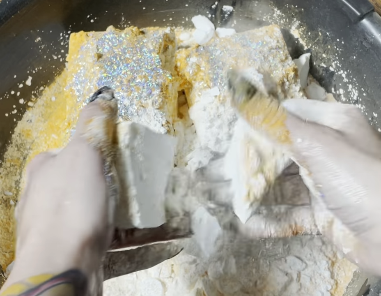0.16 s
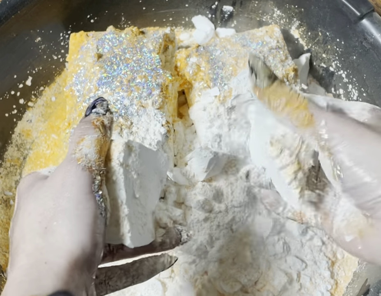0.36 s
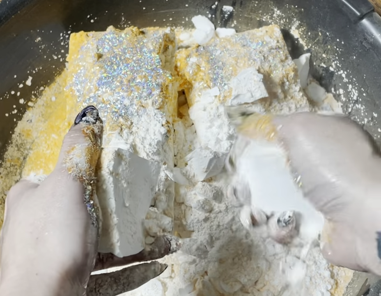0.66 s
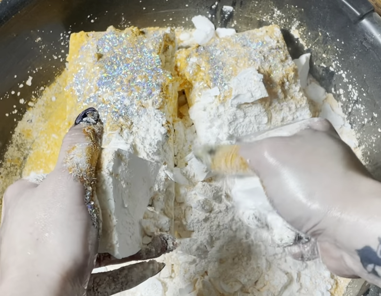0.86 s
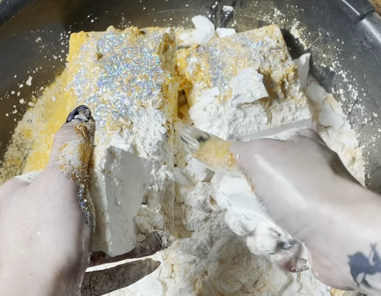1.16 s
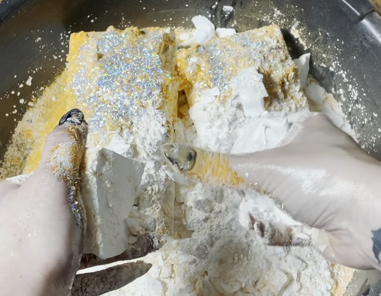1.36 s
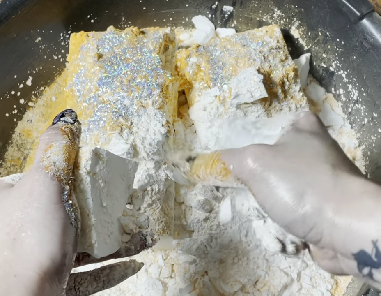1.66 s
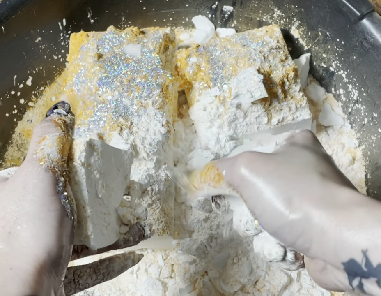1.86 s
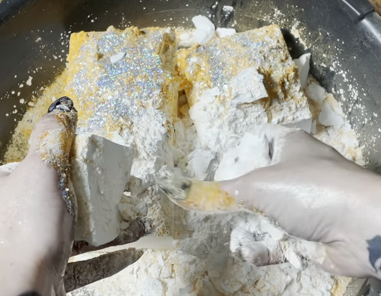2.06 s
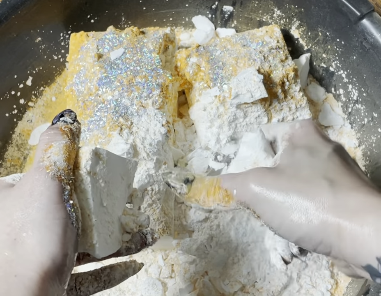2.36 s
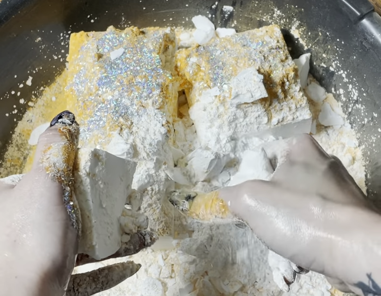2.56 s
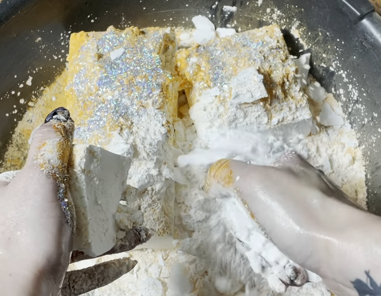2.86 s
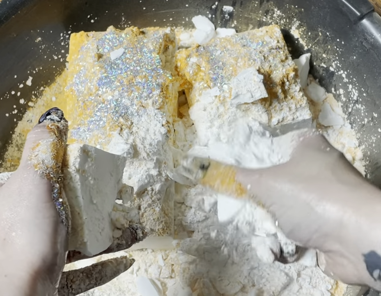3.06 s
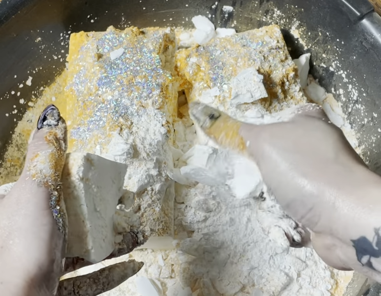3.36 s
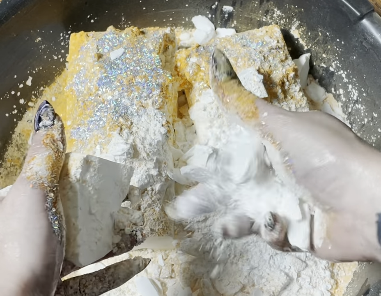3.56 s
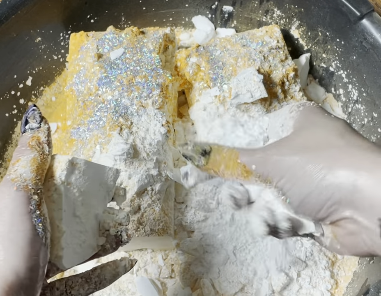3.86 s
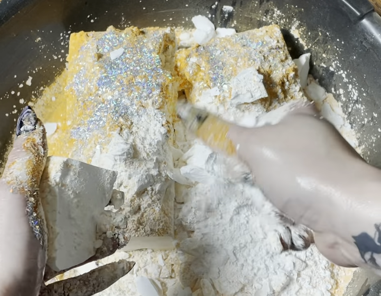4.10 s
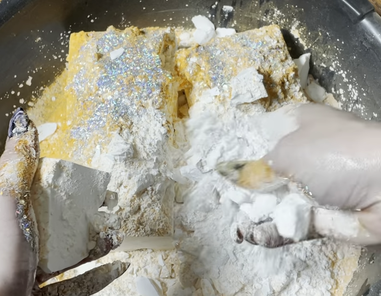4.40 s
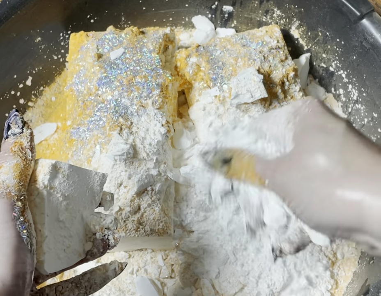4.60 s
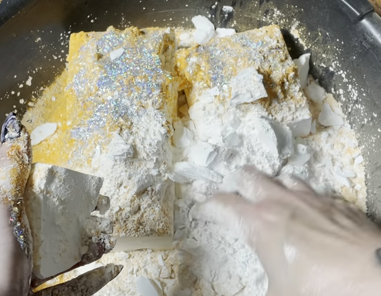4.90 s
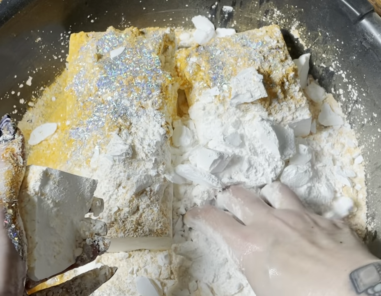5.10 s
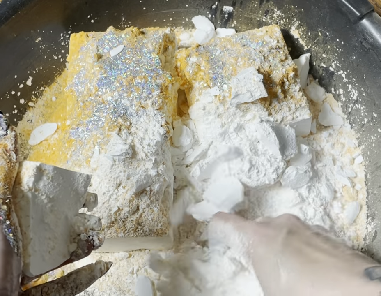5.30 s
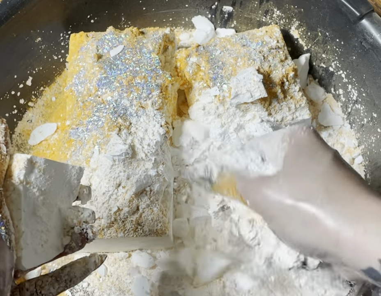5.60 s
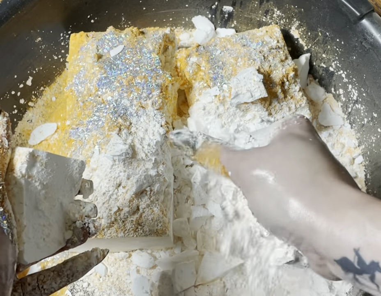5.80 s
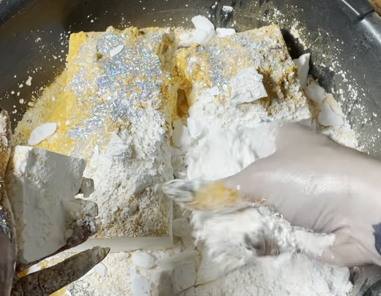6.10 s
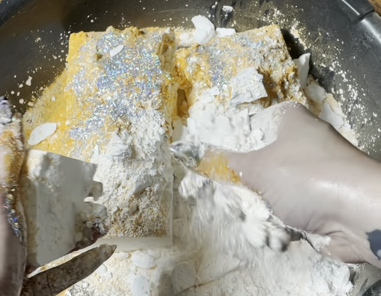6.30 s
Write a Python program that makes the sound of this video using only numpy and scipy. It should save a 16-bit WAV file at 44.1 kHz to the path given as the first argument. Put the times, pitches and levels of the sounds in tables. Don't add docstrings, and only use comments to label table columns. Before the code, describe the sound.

Dry chalk blocks crack and crunch in a squeezing fist over a powder-filled metal bowl, crumbs and gritty grains trickling down, very close and dry.

```python
import sys
import numpy as np
from scipy import signal
from scipy.fft import rfft, irfft, next_fast_len
from scipy.io import wavfile
from scipy.ndimage import uniform_filter1d

SR = 44100
rng = np.random.default_rng(int(sys.argv[2]) if len(sys.argv) > 2 else 0)


def waveform_to_disk(signal):
    frames = np.transpose(np.atleast_2d(signal))
    scaled = np.clip(frames, -1, 1) * 32767
    samples = np.round(scaled).astype(np.int16)
    wavfile.write(sys.argv[1], SR, samples)


def ratio(d):
    e = np.asarray(d, float) / 20
    return 10 ** e


N = 284440


def rms_one(x):
    return x / np.sqrt(np.mean(x ** 2) + 1e-20)


def power_sum_db(a_db, b_db):
    return 10 * np.log10(ratio(a_db) ** 2 + ratio(b_db) ** 2)


def in_time(rows):
    s, *columns = np.transpose(rows)
    return [np.interp(np.arange(N) / SR, s, c) for c in columns]


def at_hz(points, hz):
    point_hz, value = np.transpose(points)
    return np.interp(np.log(np.maximum(hz, 1)), np.log(point_hz), value)


def add(out, s, sound):
    at = round(s * SR)
    out[..., at:at + sound.shape[-1]] += sound[..., :N - at]


def resonance(x, hz, width_hz):
    r = np.exp(-np.pi * width_hz / SR)
    gain = (1 - r * r) / 2
    return signal.lfilter(np.array([1, 0, -1]) * gain, [1, -2 * r * np.cos(2 * np.pi * hz / SR), r * r], x)


def band(x, low_hz, high_hz, order):
    return signal.sosfilt(signal.butter(order, [low_hz, high_hz], "band", fs=SR, output="sos"), x)


def colour(spectrum, size=256):
    cepstrum = irfft(np.log(ratio(at_hz(spectrum, np.arange(size + 1) * SR / 2 / size))))
    cepstrum[1:size] *= 2
    cepstrum[size + 1:] = 0
    return irfft(np.exp(rfft(cepstrum)))[:size]


def drift(rate, size):
    r = np.exp(-40 * np.pi * rate / SR)
    noise = rng.standard_normal((size, N // 20 + 2002))
    slow = signal.lfilter([1], [1, -2 * r, r * r], noise)[:, 2000:]
    return np.array([np.interp(np.arange(N) / 20, np.arange(len(s)), rms_one(s)) for s in slow])


def swells(rows, rest_db):
    s, db, rise_s, release_s = np.transpose(rows)[:, :, None]
    time = np.arange(0, N + 64, 64) / SR - s
    rise = -time / np.maximum(rise_s, .01)
    release = time / np.maximum(release_s, .01)
    each_db = db - 15 * np.where(time < 0, rise, release)
    total_db = 10 * np.log10((ratio(each_db) ** 2).sum(0) + ratio(rest_db) ** 2)
    return np.interp(np.arange(N) / 64, np.arange(len(total_db)), total_db)


def strokes(rows, rest_db):
    s, length_s, start_db, end_db = np.transpose(rows)[:, :, None]
    time = np.arange(0, N + 64, 64) / SR - s
    inside = np.clip(time, 0, length_s)
    edge_db_per_s = 466
    each_db = start_db + (end_db - start_db) * inside / length_s - edge_db_per_s * np.abs(time - inside)
    total_db = np.maximum(each_db.max(0), rest_db)
    return np.interp(np.arange(N) / 64, np.arange(len(total_db)), total_db)


def fractures(shape, per_s, spread_db):
    sizes = ratio(spread_db * np.minimum(rng.exponential(1, shape), 4.5)) * rng.choice([-1, 1], shape)
    return sizes * (rng.random(shape) < per_s / SR)


# frequency in Hz, level in dB per Hz.
SNAP = [(180, -31.5), (300, 8.5), (725, -1.5), (1010, 2.5), (2360, -5.5), (4090, -4.5), (5340, -7),
        (7320, -6.5), (10200, -13), (16000, -20.5)]


def burst(excite, hz, t60, sharpness, broad_db):
    excite = excite * ratio(-60 * np.arange(len(excite)) / SR / max(t60, .002))
    snap = np.convolve(excite, colour(SNAP))[:len(excite)]
    width_hz = hz / sharpness
    ring = rms_one(resonance(snap, hz, width_hz))
    second_ring = rms_one(resonance(snap, min(1.847 * hz, 8000), width_hz))
    dull = np.exp(-2 * np.pi * 5.4 * hz / SR)
    broad = rms_one(signal.lfilter([1], [1, -dull], snap))
    sound = ring + ratio(broad_db - 1.0) * second_ring + ratio(broad_db) * broad
    return sound / np.abs(sound).max()


# start in seconds, peak in dB, ring of the lump in Hz, dying time in seconds.
CRACKS = [(0.6951, -3.5, 5530, 0.015), (0.7198, -5.5, 3660, 0.0055), (0.7499, -3.5, 3850, 0.013),
          (0.7512, -14, 3300, .015), (0.754, -8, 3300, .008), (0.7602, -13, 3360, .0045),
          (0.7636, -10, 3620, 0.0056), (0.77, -12, 3320, 0.011), (0.7914, -1.5, 3370, 0.013),
          (0.7933, -1.5, 3300, 0.011), (0.8051, -11.5, 3300, 0.023), (0.8064, -6, 3300, 0.01),
          (0.8387, 0.5, 3900, 0.0045), (0.8654, -18, 3560, 0.022), (0.8806, -9, 3650, 0.005),
          (2.3969, -17, 3930, 0.014), (2.5197, -3.5, 1940, 0.0066), (2.5224, 1, 4050, 0.0066),
          (2.5736, -12.5, 3680, 0.0062), (2.71, 4, 3830, 0.0093), (2.7137, -4, 1740, 0.02),
          (2.7174, -5, 3300, 0.021), (2.7214, -3.5, 2070, 0.028), (2.7234, -5.5, 3750, 0.027),
          (3.9308, -9, 1140, 0.0018), (3.961, -16.5, 3020, 0.0088), (3.9785, -16, 3000, 0.011),
          (4.0033, -5, 3100, 0.0078), (4.0214, -8, 5350, 0.0068), (4.0554, -11, 3300, 0.0074),
          (4.4631, -13.5, 7900, 0.009), (5.463, -21, 856, 0.036), (5.5697, -2, 3040, 0.0076),
          (1.2328, -11.5, 4440, 0.0042)]
# start in seconds, peak in dB, ring of the lump in Hz, dying time in seconds.
THUDS = [(0.3572, -27, 1060, 0.0046), (0.7, -10.5, 7250, 0.021), (1.3415, -22, 4400, 0.0074),
         (1.462, -19.5, 680, 0.014), (1.6715, -5.5, 1130, 0.0056), (2.0126, -18.5, 1500, 0.021),
         (2.433, -10.5, 3240, 0.015), (2.6833, -3.5, 3740, 0.0063), (2.8945, -19, 2370, 0.0017),
         (2.5198, -15, 486, 0.011), (4.7682, -18, 1400, 0.022), (4.9694, -2.5, 1100, 0.0039),
         (0.6952, -12, 510, 0.015), (5.142, -33, 700, 0.045), (5.21, -32, 700, 0.034),
         (5.2256, -21, 1000, 0.059), (5.28, -25, 1300, 0.037), (5.526, -21.5, 3140, 0.0092),
         (5.5694, -19, 680, 0.021), (5.59, -25, 7000, 0.009), (5.6405, -16.5, 1510, 0.014),
         (5.665, -14.5, 7100, 0.0071), (5.711, -21.5, 2220, 0.007)]
# start in seconds, peak in dB, ring of the crumb in Hz.
TICKS = [(0.2591, -19.5, 6950), (0.593, -23, 7440), (0.9262, -16.5, 3880), (0.9347, -12.5, 3630),
         (0.9711, -19.5, 4080), (1.013, -23, 4330), (1.044, -21, 5160), (1.204, -21.5, 4010),
         (1.485, -11.5, 3260), (1.6404, -17, 3500), (1.7247, -21.5, 3700), (1.797, -23.5, 7400),
         (1.9618, -26, 5700), (2.4493, -15, 3870), (3.1069, -17.5, 4060), (3.2747, -23, 6140),
         (3.3362, -20.5, 5100), (3.7927, -26, 7500), (3.921, -15, 6800), (4.01, -19, 3320),
         (4.3988, -23, 6030), (3.9817, -19, 3200), (5.744, -23, 3240), (5.845, -21.5, 2880),
         (6.438, -18, 4600), (0.73, -14, 6000), (0.733, -14, 3300), (0.779, -19, 3520), (0.8215, -25, 3800),
         (0.8542, -21, 3600), (0.992, -24, 7000), (1.019, -28, 7000), (1.118, -31, 2500),
         (2.222, -28, 2600), (1.527, -25, 6000), (1.659, -33, 1500), (3.9583, -22, 3300),
         (3.173, -30, 4000), (3.236, -25.5, 7000), (3.362, -31, 5500), (3.525, -32, 3000),
         (4.784, -29, 5500), (4.815, -27.5, 5000), (5.812, -23, 4200), (5.484, -23, 2500),
         (0.569, -27, 5200), (5.68, -18, 6000)]
# start in seconds, peak in dB, ring of the piece in Hz.
CLACKS = [(1.5129, -23.5, 2450), (1.595, -39, 3100), (1.9179, -29, 1410), (2.14, -27, 1340),
          (2.341, -27, 795), (2.827, -22, 1570), (3.013, -27, 1080), (3.5926, -31, 2180),
          (3.6679, -23, 1180), (3.9016, -23, 3230), (3.9232, -20.5, 2720), (4.452, -28.5, 664),
          (4.756, -27, 3000), (4.763, -17.5, 1400), (5.1855, -24, 890), (5.4674, -22, 1160),
          (6.005, -27, 1820), (6.1807, -29, 1510), (6.213, -21.5, 1300), (6.332, -22.5, 1190), ]
# start in seconds, peak in dB, ring of the crumb
# in Hz.
CRUMBS = [(0.257, -24.5, 6300), (0.5925, -27, 7200), (0.7238, -14, 3640), (0.7496, -11, 3270),
          (0.8734, -12.5, 5040), (0.8987, -24, 4440), (0.9497, -18, 5510), (0.9898, -26.5, 3080),
          (1.0514, -30, 3360), (1.086, -27.5, 4200), (1.096, -29, 2860), (1.1224, -27, 3570),
          (1.2274, -20, 4720), (1.464, -15.5, 4700), (1.5952, -28, 3140), (1.6186, -22.5, 3230),
          (1.669, -13, 2220), (1.8504, -34, 4200), (1.8573, -30, 5660), (1.8776, -28, 4100),
          (1.9104, -24.5, 4330), (2.25, -29, 4290), (2.331, -26.5, 3730), (2.3824, -26, 6220),
          (2.4152, -25, 5020), (2.465, -18, 8460), (2.563, -16, 4610), (2.649, -24.5, 3380),
          (2.657, -24, 3060), (2.6852, -1, 4200), (2.7983, -19, 3600), (2.8721, -30, 4480),
          (2.8812, -26, 2220), (2.8954, -18, 2580), (2.9884, -27.5, 5600), (3.372, -29, 3190),
          (3.383, -33, 3270), (3.3984, -23, 3300), (3.451, -29, 3150), (3.6035, -27.5, 6330),
          (3.7083, -32, 4350), (3.9055, -27, 3360), (3.9748, -24, 3230), (3.9896, -27, 5190),
          (4.1001, -19, 5600), (4.148, -27, 3210), (4.6574, -29, 2650), (4.759, -21, 3170),
          (4.7668, -15.5, 2200), (4.9694, -13, 5000), (5.4663, -24, 2540), (5.4716, -16.5, 2690),
          (5.6566, -16.5, 3140), (5.7377, -21.5, 3380), (5.7766, -24.5, 3420), (5.8657, -28, 3550),
          (6.1766, -28, 2650), (6.372, -25, 2560), (6.4016, -29, 3190), (6.427, -32, 3170)]
# start in seconds, peak in dB, ring of the piece in Hz.
NUDGES = [(0.3452, -34, 1270), (0.8055, -14, 1920), (0.8722, -27, 1230), (1.0236, -35, 1230),
          (1.122, -34, 1410), (1.1527, -36, 1490), (1.2318, -30, 1060), (1.4434, -27, 540),
          (1.5122, -30, 2130), (2.598, -25, 1150), (1.622, -35, 1290), (1.797, -30, 1280),
          (1.9599, -33, 880), (2.3236, -33, 1310), (2.3617, -34, 1740), (2.3682, -31, 1850),
          (2.3968, -18.5, 1410), (2.8741, -24.5, 510), (2.8798, -31, 2170), (3.1698, -33, 970),
          (3.2774, -33, 1380), (3.3004, -28, 520), (3.6284, -31, 542), (5.175, -25, 620),
          (3.8888, -29, 1080), (4.0212, -19.5, 1060), (4.1084, -34, 990), (4.15, -35, 1400),
          (4.1598, -32, 1410), (4.7762, -26, 1340), (5.2397, -19, 1440), (5.4405, -23, 1440),
          (5.5231, -23.5, 540), (5.8683, -32, 1340), (5.9162, -36, 650), (2.555, -20, 1100),
          (6.3126, -27, 1070), (6.385, -28, 1030), (6.412, -35, 1060), (6.4377, -23, 1440)]
DRY_PUSH_DB, HEAVY_PUSH_DB = -26.5, -9
TICK_S, CLACK_S, CRUMB_S, NUDGE_S = 0.0085, 0.015, 0.0068, 0.014


def cracks():
    rows = [(*row, DRY_PUSH_DB) for row in CRACKS] + [(*row, HEAVY_PUSH_DB) for row in THUDS]
    for small, t60 in [(TICKS, TICK_S), (CLACKS, CLACK_S), (CRUMBS, CRUMB_S), (NUDGES, NUDGE_S)]:
        rows += [(*row, t60, DRY_PUSH_DB) for row in small]
    out, time = np.zeros((2, N)), np.arange(1400) / SR
    trains = fractures((len(rows), 1400), per_s=9000, spread_db=4.5)
    trains[:, 3] = 5.5
    push = np.sin(2 * np.pi * 380 * time) * ratio(-60 * time / 0.01)
    for k, ((s, db, hz, t60, push_db), train) in enumerate(zip(rows, trains)):
        broad_db = -9.5 + 2.7 * np.log2(3500 / hz)
        sound = burst(train, hz, t60, sharpness=3.2, broad_db=broad_db) + ratio(push_db + 6.5) * push
        add(out[k % 2], s, ratio(db) * sound)
    return out


# start in seconds, peak in dB, centre in Hz, dying time in seconds,
# sharpness of the ring as a plain ratio.
CRUNCHES = [(0.6949, -9.5, 940, 0.0077, 0.77), (0.699, -6, 3430, 0.02, 4.3), (0.7127, -9, 7350, 0.03, 15),
            (0.04, -34, 5640, 0.33, 5), (1.6696, -10, 1520, 0.055, 0.19), (2.012, -19, 1830, 0.75, 2.6),
            (2.522, -15, 2040, 0.6, 2.9), (2.685, 4, 2350, 0.016, 1.8), (2.709, -3.5, 2200, 0.47, 1.6),
            (2.895, -16.5, 1110, 0.24, 0.9), (4.768, -7, 1400, 0.034, 9.1), (4.784, -21, 1400, 0.63, 8.9),
            (4.971, -13.5, 1400, 0.76, 3)]


def crunches():
    out = np.zeros(N)
    trains = fractures((len(CRUNCHES), 9000), per_s=5000, spread_db=4.5)
    trains *= 1 + 3.3 * np.exp(-np.arange(9000) / 250)
    for (s, db, hz, t60, sharpness), train in zip(CRUNCHES, trains):
        add(out, s, ratio(db) * burst(train, hz, t60, sharpness, broad_db=-2.5 * sharpness))
    return out


# time in seconds, slips per second, level in dB.
CREAK = [
    (1.138, 120, -17.5),
    (1.165, 240, -19.5),
    (1.205, 260, -21.5),
]
# frequency in Hz, width in Hz, level in dB.
CREAK_RINGS = [(1690, 800, 0.5), (2230, 1300, -16), (4530, 900, -5), (6800, 1200, -27)]


def creak():
    per_s, level_db = in_time(CREAK)
    time = np.arange(N) / SR
    squeezed = (time > CREAK[0][0]) * (time < CREAK[-1][0])
    turns = np.cumsum(per_s * squeezed) / SR
    sizes = ratio(level_db + 2.7 * rng.standard_normal(N))
    slips = np.diff(np.ceil(turns), prepend=0) * sizes + 1e-18
    rings = sum(ratio(db) * resonance(slips, hz, width_hz) * 1000 / width_hz
                for hz, width_hz, db in CREAK_RINGS)
    return ratio(10.0) * rings


# start in seconds, peak in dB, frequency in Hz.
CHIRPS = [
    (.109, -44, 2650),
    (.486, -41, 2750),
    (0.53, -53, 1700),
]


def chirps():
    out, time = np.zeros(N), np.arange(800) / SR
    swell = time / .002 * np.exp(1 - time / .002)
    for s, db, hz in CHIRPS:
        add(out, s, ratio(db) * swell * np.sin(2 * np.pi * hz * time))
    return out


# start in seconds, length in seconds, first and last level in dB.
SQUEEZES = [(0, 0.11, -46.5, -55.5), (.25, 0.16, -55, -57.5), (.46, 0.16, -53.5, -54),
            (.6, 0.094, -48, -42.5), (.7, 0.15, -38, -40.5), (.87, 0.21, -46.5, -49.5),
            (1.13, 0.13, -48, -41.5), (1.28, 0.32, -50, -45.5), (1.68, 0.21, -41, -60.5),
            (1.91, 0.077, -54.5, -41.5), (2.02, 0.22, -53.5, -47.5), (2.29, 0.092, -49, -49.5),
            (2.44, .04, -48.5, -46), (2.53, 0.16, -44, -56), (2.71, 0.12, -27.5, -55),
            (2.85, 0.21, -48.5, -49), (3.1, 0.32, -47, -54.5), (3.38, 0.22, -41.5, -63.5),
            (3.6, 0.51, -57, -46.5), (3.9, 0.13, -51.5, -44), (4.05, 0.25, -49, -50.5),
            (4.4, 0.064, -57, -40.5), (4.47, 0.2, -49, -46), (4.75, 0.26, -46.5, -58),
            (4.98, 0.32, -48, -41.5), (5.29, 0.16, -47.5, -50.5), (5.46, 0.11, -48, -52),
            (5.56, 0.38, -43, -51.5), (6.0, 0.076, -53.5, -49), (6.13, 0.29, -50, -42.5)]
# peak time in seconds, level in dB, rise in seconds, release in seconds.
TUMBLES = [(.379, -51, 0.055, 0.04), (2.018, -33, 0.011, 0.15), (2.544, -57, 0.03, 0.12),
           (2.91, -39.5, 0.058, 0.089), (3.187, -46.5, 0.28, 0.64), (4.775, -33.5, 0.022, 0.12),
           (4.95, -30.5, 0.074, 0.15), (5.15, -31.5, 0.023, 0.17), (5.25, -33.5, 0.12, 0.23),
           (5.47, -36.5, 0.14, 0.12), (5.661, -39, 0.23, 0.28)]
# peak time in seconds, level in dB, rise in seconds, release in seconds.
PUFFS = [(.093, -47.5, 0.1, 0.03), (.31, -52, 0.26, 0.13), (.676, -48.5, 0.4, 0.015), (1.7, -56, .05, 0.16),
         (1.98, -48.5, 0.1, 0.028), (2.04, -46, 0.04, 0.069), (2.54, -52, 0.064, 0.06),
         (3.187, -52.5, 0.059, 0.45), (3.41, -70, 0.088, 0.068), (4.1, -46.5, 0.057, 0.068),
         (4.77, -47, 0.05, 0.049), (5.08, -47, 0.06, 0.092), (5.23, -45, 0.16, 0.08)]
# frequency in Hz, level in dB per Hz.
GRIT = [(120, -35), (200, -5.5), (473, -5), (738, -8.5), (983, -7.5), (2480, -2), (3350, -0.5), (7090, -3),
        (9000, -8.5), (11700, -67), (19800, -120)]
# frequency in Hz, share common to both as a plain ratio.
LIKENESS = [(200, 0.22), (600, 0.91), (2000, 0.81), (8000, 0.82), (15000, 0.74)]
# frequency in Hz, width in Hz, level in dB.
HOLLOWS = [(1400, 40, -1.5), (3300, 830, -6)]
REST_GRIT_DB, REST_LUMPS_DB, REST_DUST_DB = -62, -57, -75
LUMPS_IN_GRIT_DB, DUST_IN_GRIT_DB = -2, -11.5


def crumble():
    grit_db = strokes(SQUEEZES, REST_GRIT_DB)
    dust_db = power_sum_db(swells(PUFFS, REST_DUST_DB), grit_db + DUST_IN_GRIT_DB)
    coarse_db = power_sum_db(swells(TUMBLES, REST_LUMPS_DB), grit_db + LUMPS_IN_GRIT_DB)
    edges = np.append(200 * 2 ** np.arange(0, 5.6, .5), [10400, 17000])
    slips = ratio(1.3 * drift(40, size=1)[0])
    patches = drift(8.7, size=len(edges))
    ticks = rms_one(fractures(N, 350 * slips ** 2, spread_db=4.7))
    pops = fractures((2, N), 400 * slips ** 2, spread_db=4.6)
    white = rng.standard_normal((2, 2, N)) * slips
    out = np.zeros((2, N))
    for k, (low, high) in enumerate(zip(edges, edges[1:])):
        hz = np.sqrt(low * high)
        if high == edges[-1]:
            level_db, grains = dust_db + 3.5, 0.33 * ticks
        else:
            coarse = np.clip(np.log2(3400 / hz) / 2, 0, 1)
            lumps_db = coarse_db + 8.5 - at_hz(GRIT, 430)
            fine_db = grit_db + 1.5 - at_hz(GRIT, 2430)
            level_db = coarse * lumps_db + (1 - coarse) * fine_db + at_hz(GRIT, hz)
            if hz > 4500:
                level_db = power_sum_db(level_db, dust_db + 5.5 - 2.0 * (hz > 7000))
            group = k // 3
            grains = .65 * ticks + 1.05 * rms_one(np.roll(pops[group % 2], 5000 * group))
        bands = band(white[k % 2] + [[1], [0]] * grains, low, high, order=3)
        if high == edges[-1]:
            bands = signal.lfilter([1, .5], [1.2], bands)
        alike = np.clip(at_hz(LIKENESS, hz), 0, 1)
        out += ratio(level_db + 2.12 * patches[k]) * bands * [[np.sqrt(alike)], [np.sqrt(1 - alike)]]
    return out + sum(ratio(db) * resonance(out, hz, width_hz) for hz, width_hz, db in HOLLOWS)


# start in seconds, peak in dB.
BOWL_KNOCKS = [
    (0.353, -59.5),
    (2.013, -48),
    (2.15, -50),
    (2.893, -56),
    (4.766, -51),
    (4.964, -46.5),
    (5.2, -46.5),
]
# frequency in Hz, level in dB, 60 dB decay time in seconds.
BOWL = [(291.6, 3.5, 0.56), (632, 12, 0.054)]


def bowl():
    out, time = np.zeros(N), np.arange(SR // 2) / SR
    hum = sum(ratio(db - 60 * time / t60) * np.sin(2 * np.pi * hz * time) for hz, db, t60 in BOWL)
    for s, db in BOWL_KNOCKS:
        add(out, s, ratio(db + 6.0) * hum)
    return out


# peak time in seconds, level in dB, rise in seconds, release in seconds.
PUSHES = [(.42, -42, 0.45, 0.18), (.798, -40, 0.15, 0.091), (1.15, -47.5, 0.25, 0.055),
          (1.343, -46, 0.085, 0.089), (1.476, -39, 0.029, 0.23), (2.043, -34, .06, 0.13),
          (2.348, -51, 0.11, .9), (2.686, -36, 0.15, 0.076), (2.92, -29.5, 0.024, 0.23),
          (3.22, -42, 0.096, 0.061), (3.36, -42, 0.2, 0.34), (3.8, -50, 3.8, 3.3), (4.524, -48, 0.11, 1.5),
          (4.778, -30.5, 0.016, 0.54), (5.001, -19, 0.064, 0.069), (5.25, -27, 0.33, 0.26),
          (5.694, -35.5, 0.34, 0.038), (5.909, -43, .6, 0.22), (6.44, -49.5, 2.1, .5)]
# peak time in seconds, level in dB, rise in seconds,
# release in seconds.
PUSHES_RIGHT = [(.3, -45, .4, .4), (.798, -29, 0.1, 0.057), (1.476, -46, .05, .2),
                (2.043, -41, 0.081, 0.27), (2.7, -40, .15, 0.15), (2.92, -30, 0.073, 0.064),
                (3.25, -42, 0.3, 0.37), (4.1, -47.5, 2.1, 0.84), (4.778, -33, .016, .3),
                (5.001, -18.5, 0.12, 0.12), (5.25, -28.5, 0.38, 0.12), (5.65, -39, 0.34, 0.11),
                (6.0, -50, 0.73, 0.92)]
# time in seconds, level in dB.
LEAN = [(0, -42), (.42, -50.5), (.798, -46), (1.476, -47), (1.75, -40), (2.043, -43), (2.254, -43.5),
        (2.98, -43), (3.13, -39.5), (3.3, -50.5), (4.55, -43.5), (4.76, -41), (5.0, -27), (5.6, -26.5),
        (5.8, -41.5)]
# frequency in Hz, width in Hz, level in dB.
STAND_LEFT = [(88.5, 17.7, 0.5)]
# frequency in Hz, width in Hz, level in dB.
STAND_RIGHT = [(60, 72, 4.5), (109, 77, -0.5)]
REST_HUM_DB = -55.5


def stand(push, modes):
    hum = sum(ratio(db) * resonance(resonance(push, hz, width_hz), hz, width_hz)
              for hz, width_hz, db in modes)
    return rms_one(hum)


def shake():
    hum_db = np.array([swells(rows, REST_HUM_DB) for rows in (PUSHES, PUSHES_RIGHT)])
    sway_db, = in_time(LEAN)
    pushes = rng.standard_normal((2, N))
    pushes[1] += -.7 * pushes[0]
    hum = np.array([stand(pushes[0], STAND_LEFT), stand(pushes[1], STAND_RIGHT)])
    hum = hum / (uniform_filter1d(hum ** 2, size=2200) + 0.059) ** 0.27
    hum = signal.sosfilt(signal.butter(4, 170, fs=SR, output="sos"), hum)
    sway = rms_one(band(rng.standard_normal((2, N)), 12, 25, order=2))
    sway = sway / (uniform_filter1d(sway ** 2, size=4000) + 0.22) ** 0.29
    return ratio(hum_db + np.array([[4.5], [.5]])) * hum + ratio(sway_db + np.array([[-.5], [4.5]])) * sway


# time in seconds, half length in seconds, peak in dB.
BUMP = (5.0, 0.0098, -3.5)


def bump():
    s, half_s, db = BUMP
    time = np.arange(N) / SR - s
    hz = np.array([[STAND_LEFT[0][0]], [STAND_RIGHT[0][0]]])
    swing = np.exp(-(time / half_s) ** 2 / 2) * np.cos(2 * np.pi * hz * time)
    return ratio(db + np.array([[0], [-4.0]])) * swing * [[1], [-1]]


def reflections(x):
    time = np.arange(6000) / SR
    decay = ratio(-60 * time / 0.011) + ratio(-17.0 - 60 * time / 0.4)
    scatter = rng.standard_normal((2, 6000)) * decay * (time > .0008)
    scatter = signal.lfilter([.7], [1, -.3], scatter)
    scatter /= np.sqrt((scatter ** 2).sum(1, keepdims=True))
    return signal.fftconvolve(x[None], scatter, axes=1)[:, :N]


LEFT_LAG_S, LAG_SPREAD_S, LEFT_DB, PAN_SPREAD_DB = 3.3e-5, .9e-5, -2, .9


def ports(left, right, lag_s):
    size = next_fast_len(N + 64)
    hz = np.arange(size // 2 + 1) * SR / size
    late = irfft(rfft(left, size) * np.exp(-2j * np.pi * hz * lag_s), size)[:N]
    return np.array([late * ratio(LEFT_DB / 2), right * ratio(-LEFT_DB / 2)])


def scene():
    thumb_side, finger_side = cracks()
    swarm = crunches() + creak() + chirps()
    common, unshared = crumble()
    near, far = ratio(PAN_SPREAD_DB), ratio(-PAN_SPREAD_DB)
    direct = ports(thumb_side * near, thumb_side * far, LEFT_LAG_S - LAG_SPREAD_S)
    direct += ports(finger_side * far, finger_side * near, LEFT_LAG_S + LAG_SPREAD_S)
    direct += ports(swarm + common + unshared, swarm + common - unshared, LEFT_LAG_S)
    room = ratio(-12.0) * reflections(thumb_side + finger_side + swarm)
    return direct + room + bowl() * ratio([[4.0], [-7.0]]) + shake() + bump()


def low_pass(x):
    return signal.sosfilt(signal.butter(12, 16530, fs=SR, output="sos"), x)


def record(dry):
    dry = dry + ratio(-69) * rng.standard_normal(dry.shape)
    top_cut = signal.ellip(8, .5, 50, 15650, fs=SR, output="sos")
    mix = signal.sosfilt(top_cut, np.clip(dry, -1, 1))
    return low_pass(mix)


dry = scene()
out = record(dry)
waveform_to_disk(out)
```